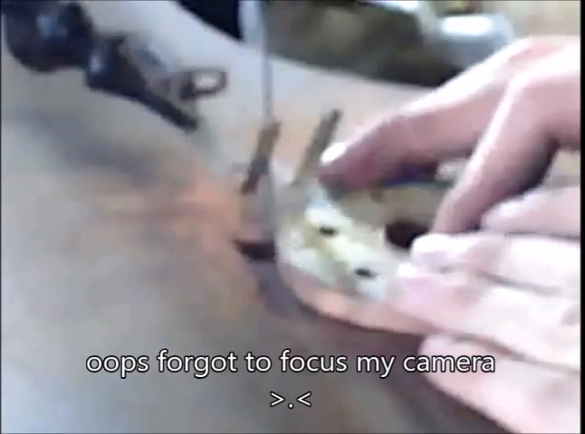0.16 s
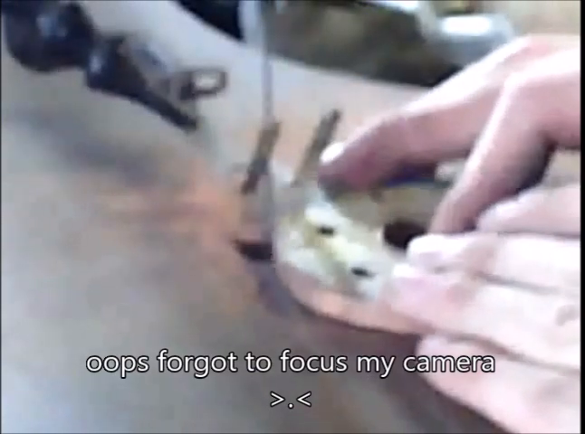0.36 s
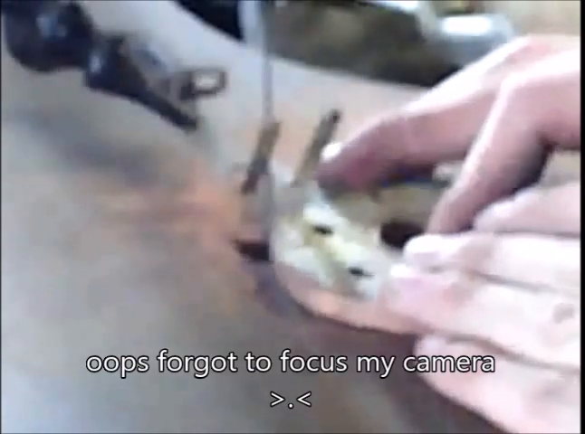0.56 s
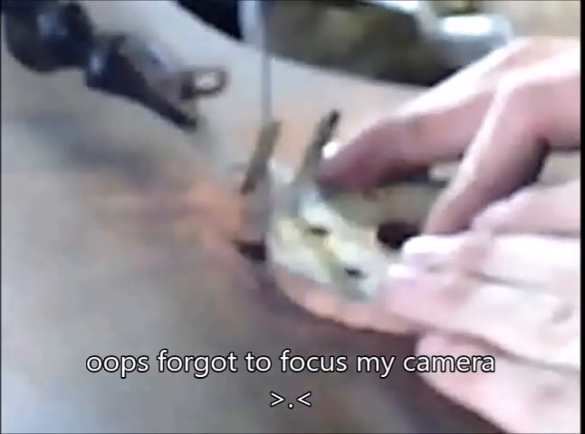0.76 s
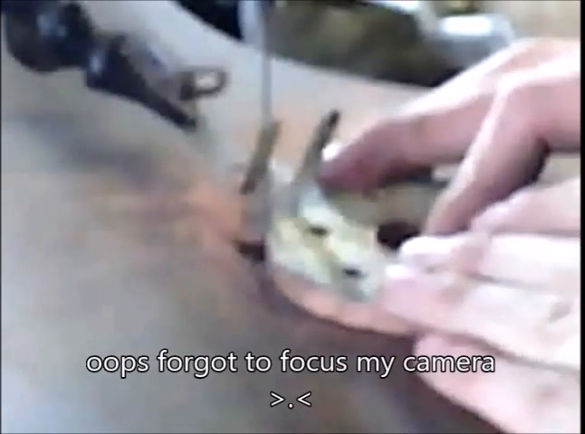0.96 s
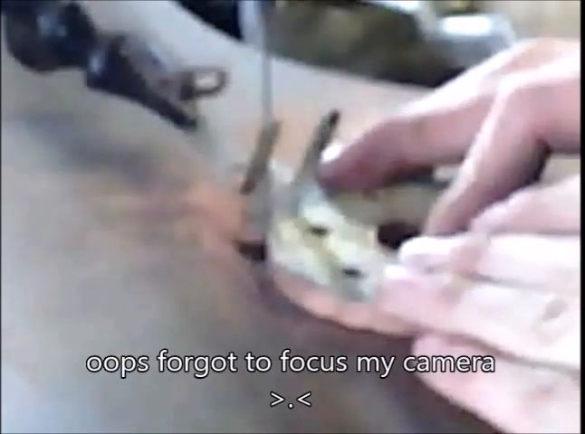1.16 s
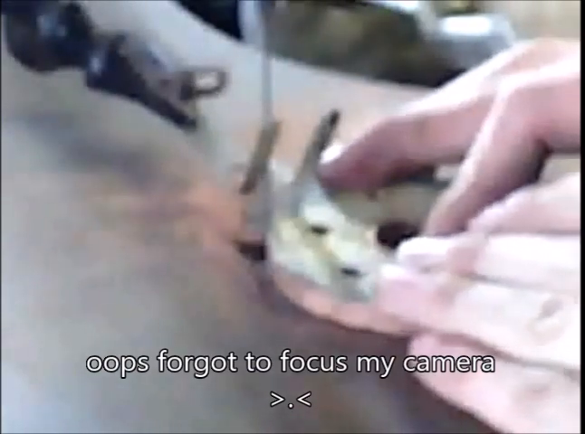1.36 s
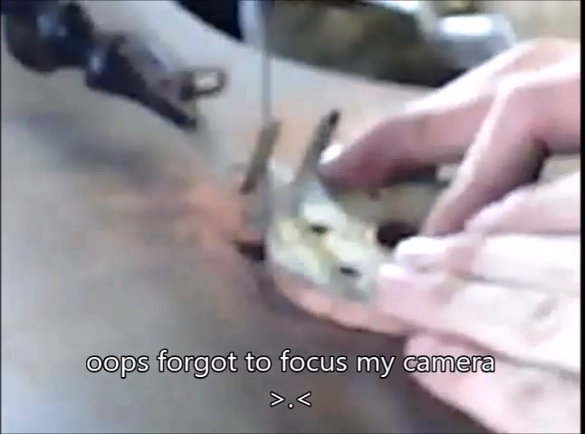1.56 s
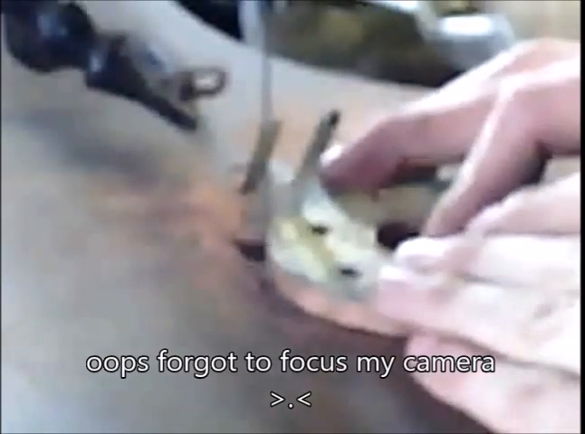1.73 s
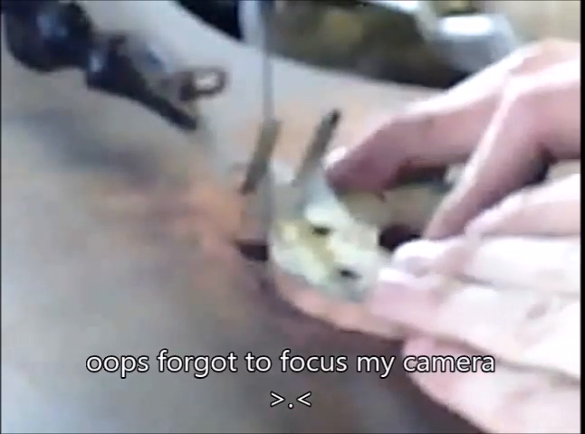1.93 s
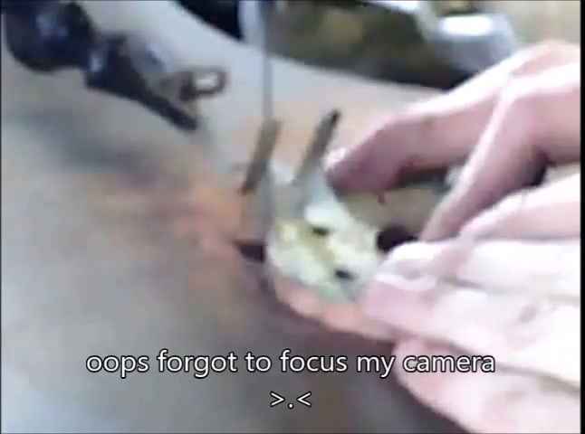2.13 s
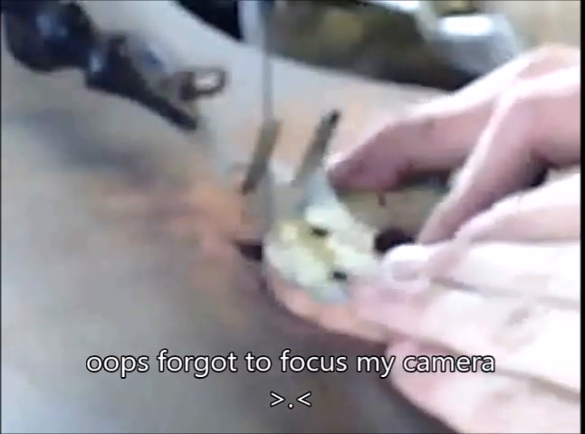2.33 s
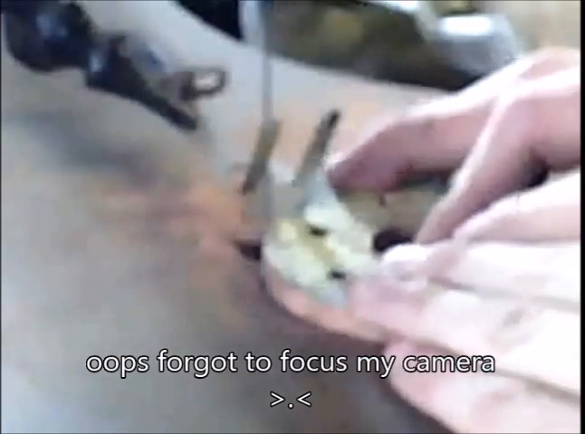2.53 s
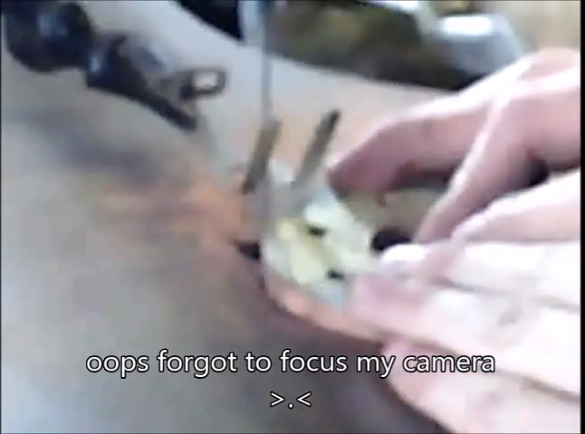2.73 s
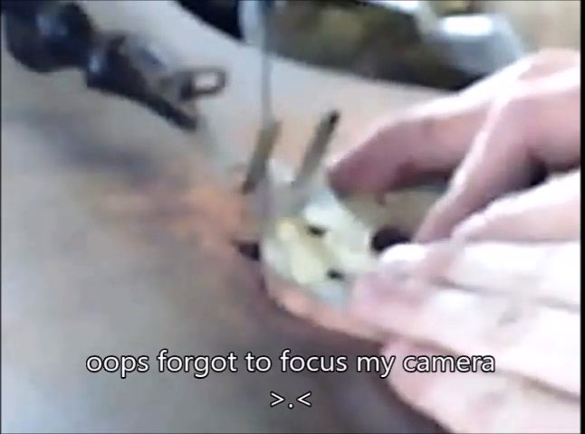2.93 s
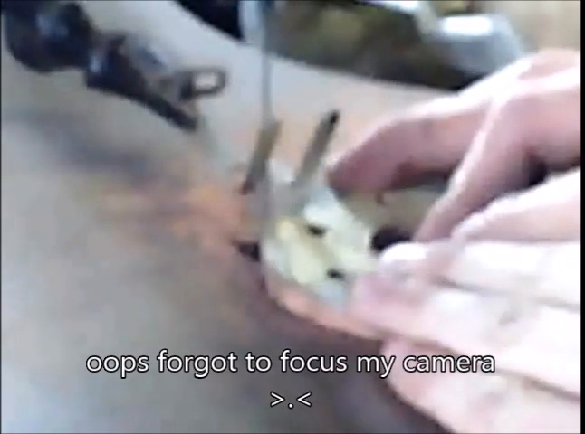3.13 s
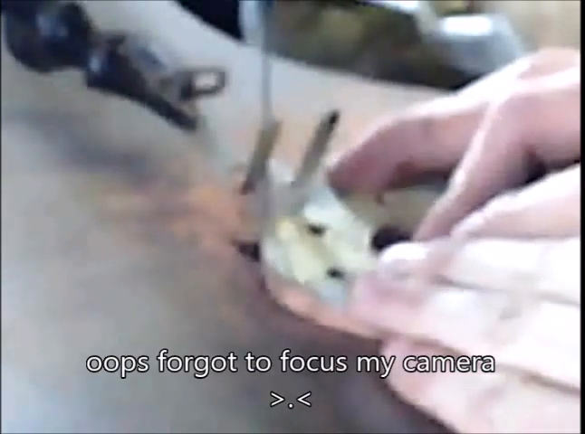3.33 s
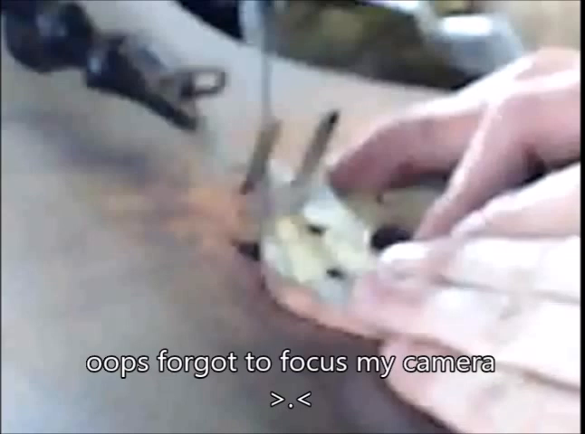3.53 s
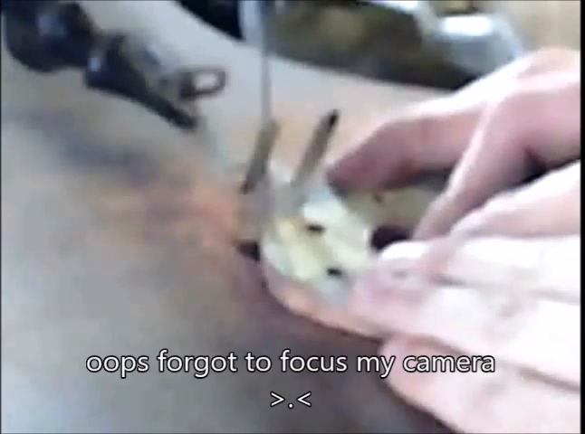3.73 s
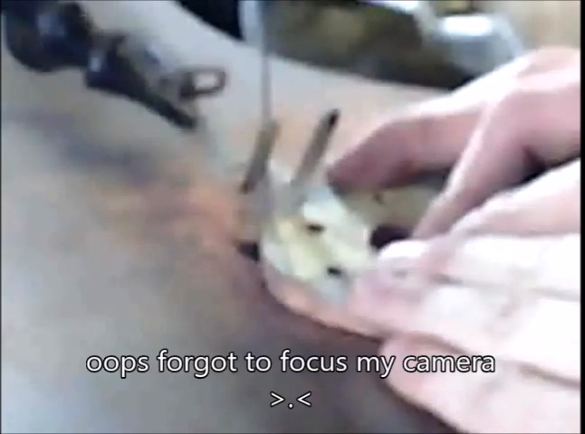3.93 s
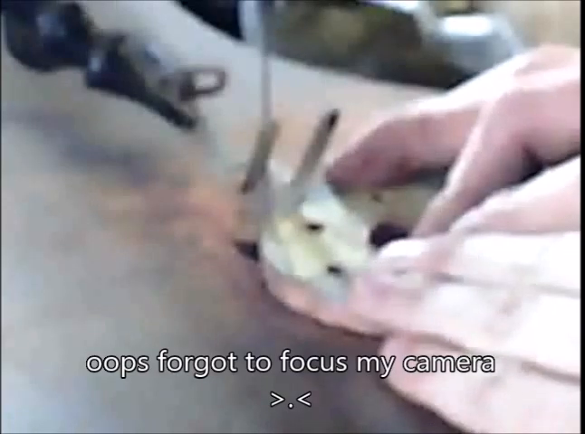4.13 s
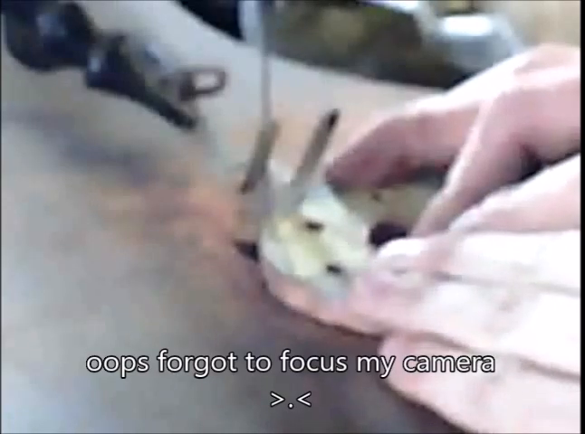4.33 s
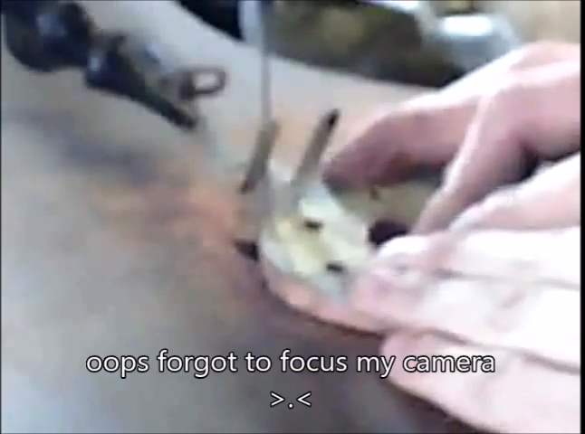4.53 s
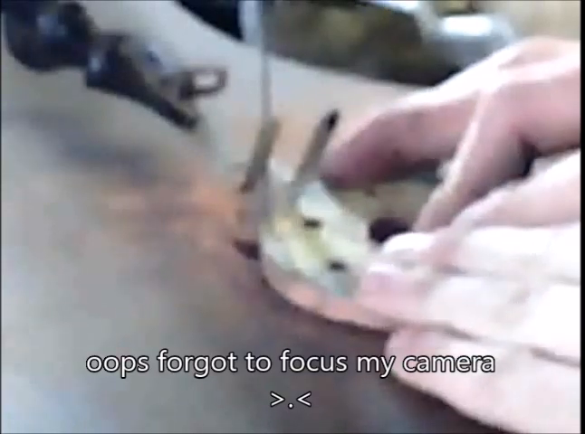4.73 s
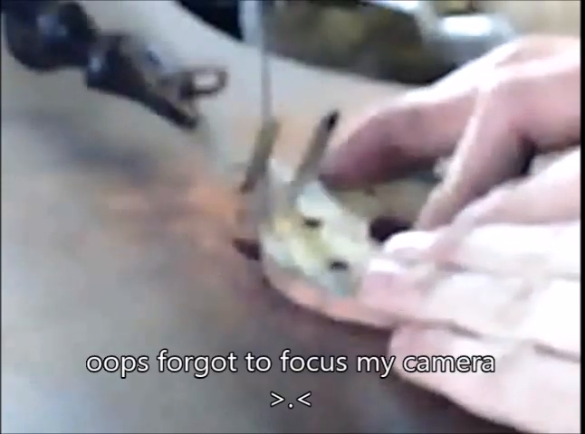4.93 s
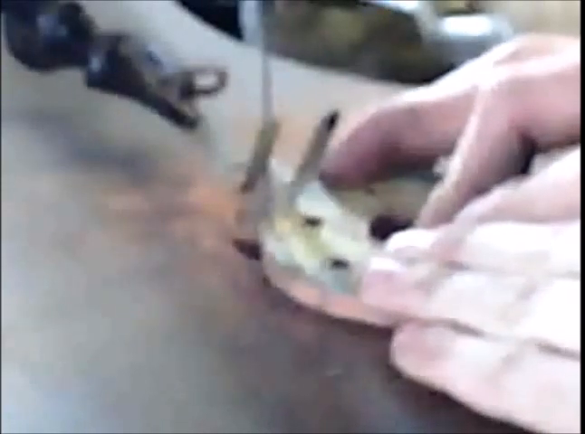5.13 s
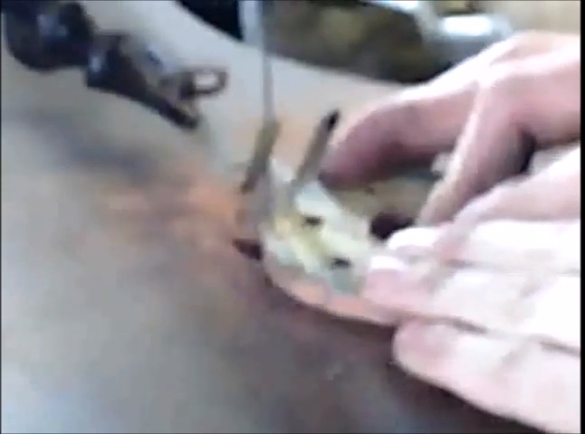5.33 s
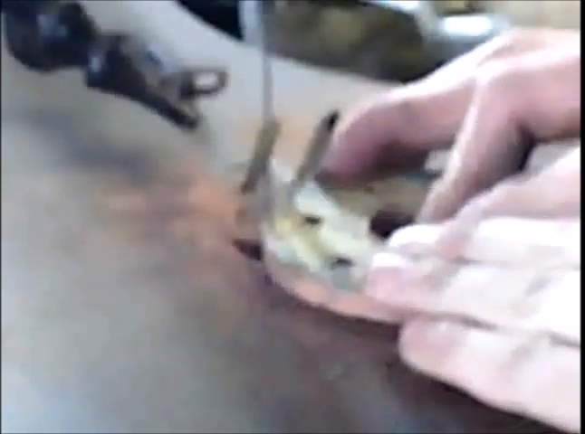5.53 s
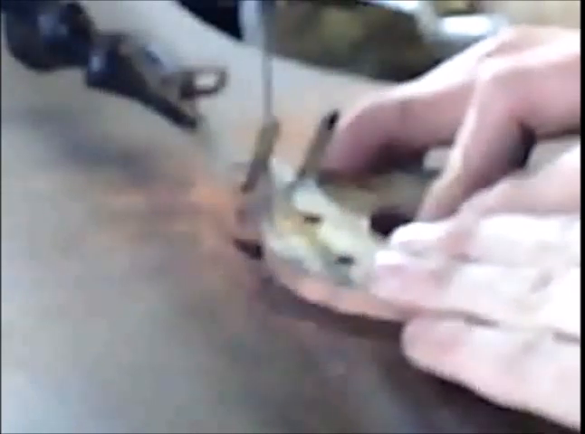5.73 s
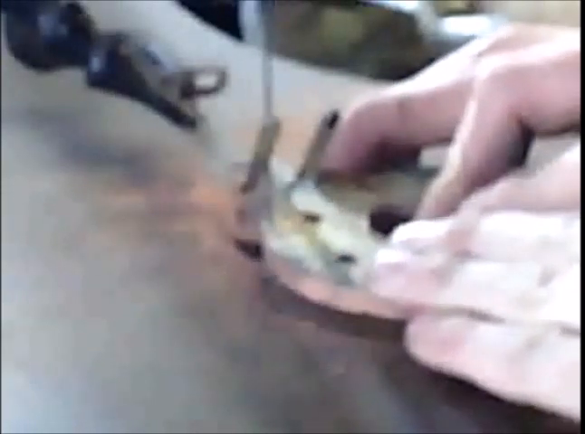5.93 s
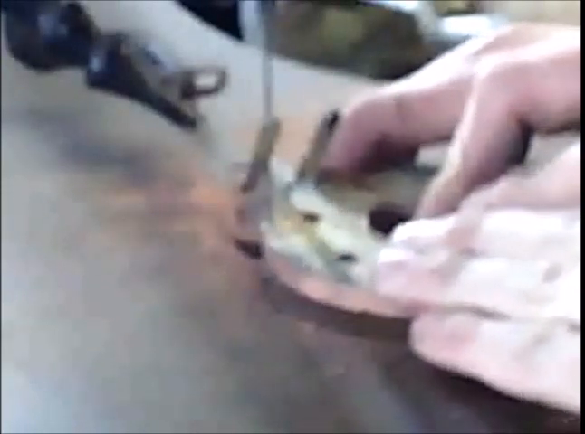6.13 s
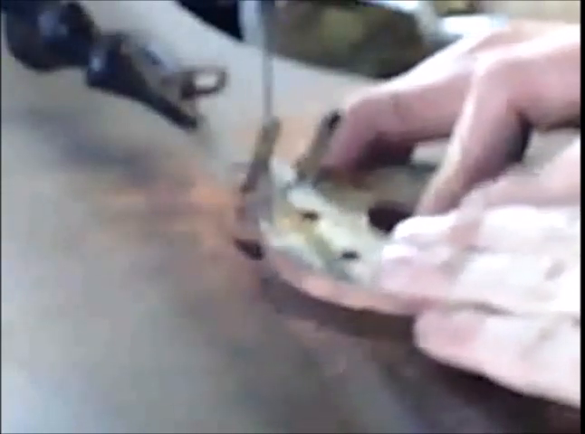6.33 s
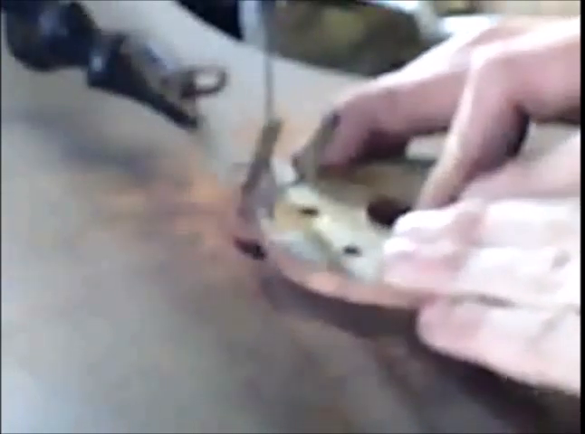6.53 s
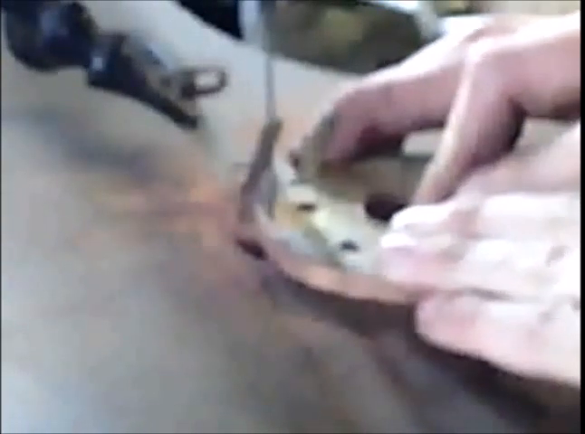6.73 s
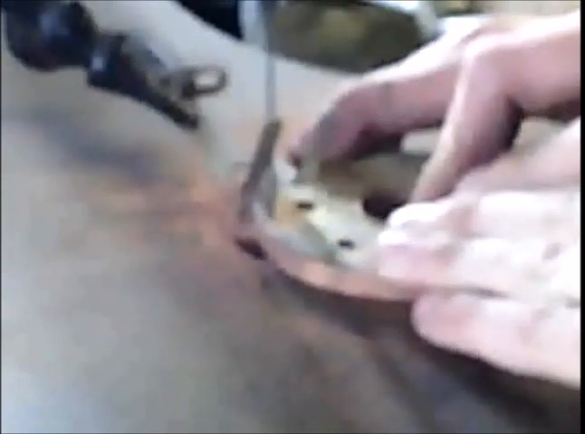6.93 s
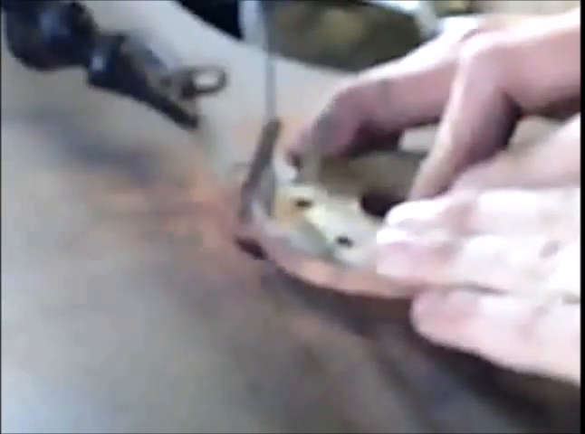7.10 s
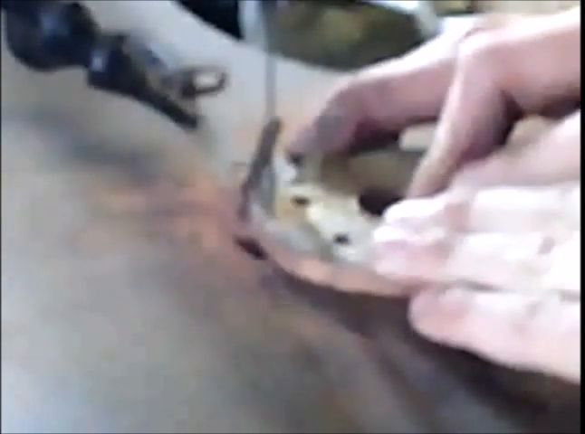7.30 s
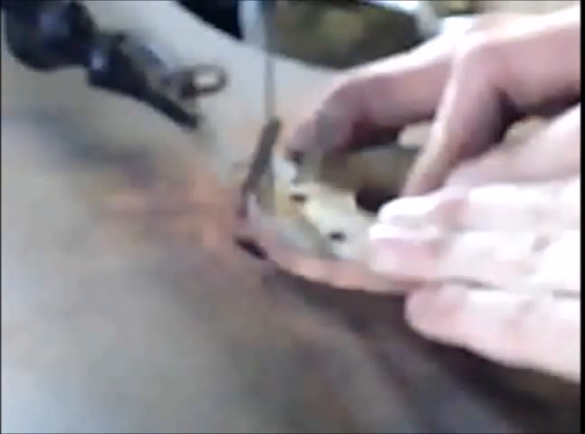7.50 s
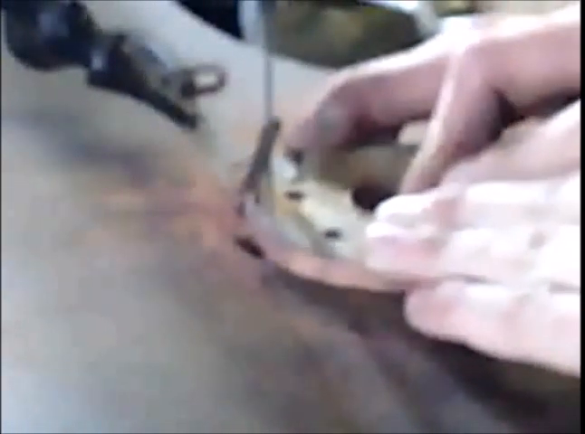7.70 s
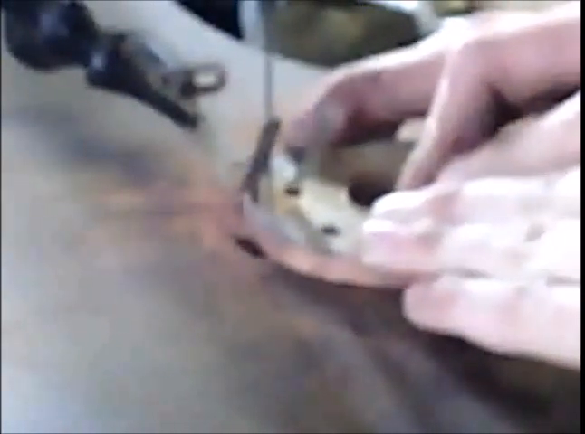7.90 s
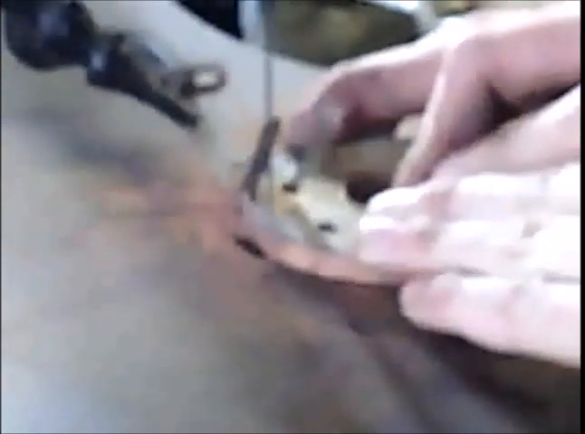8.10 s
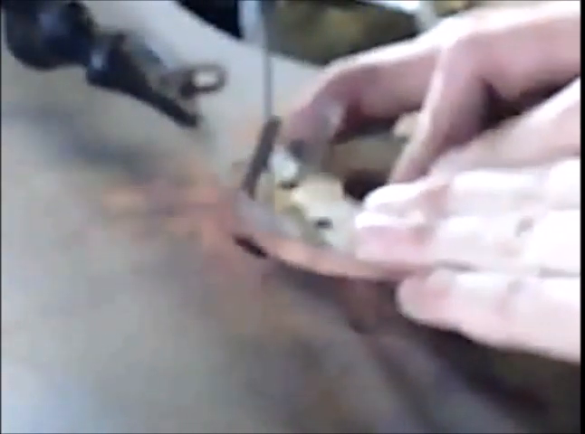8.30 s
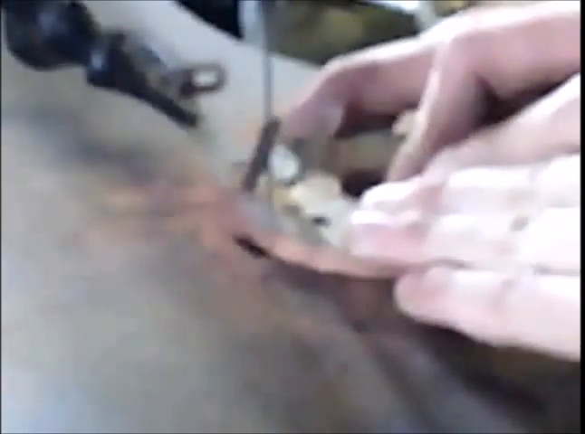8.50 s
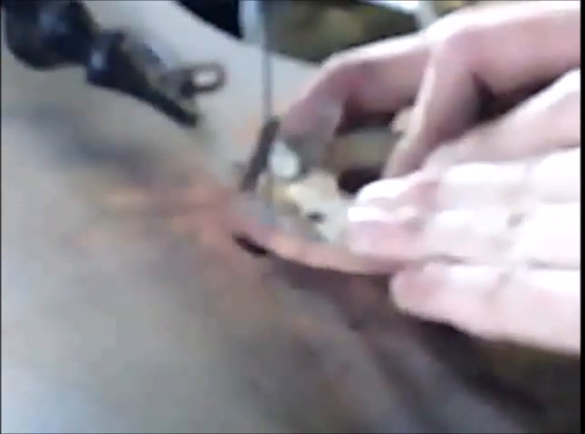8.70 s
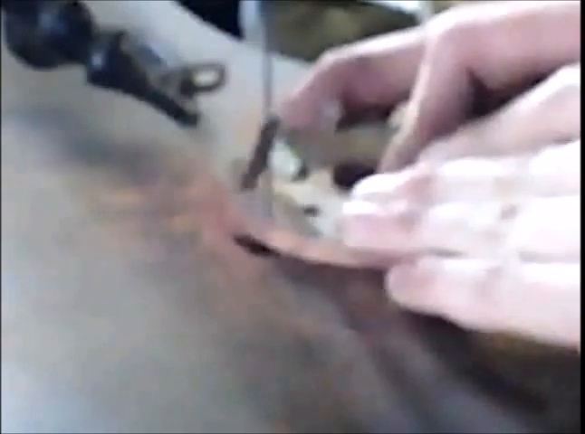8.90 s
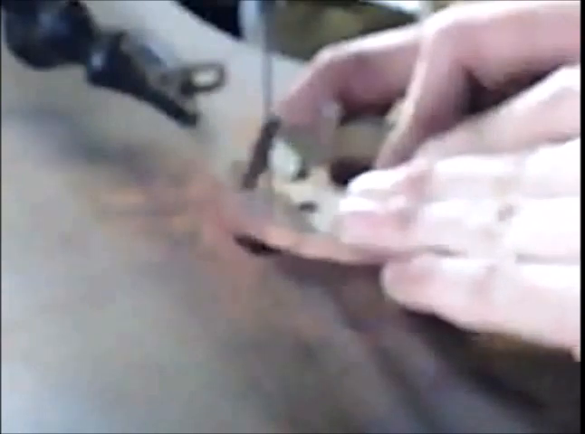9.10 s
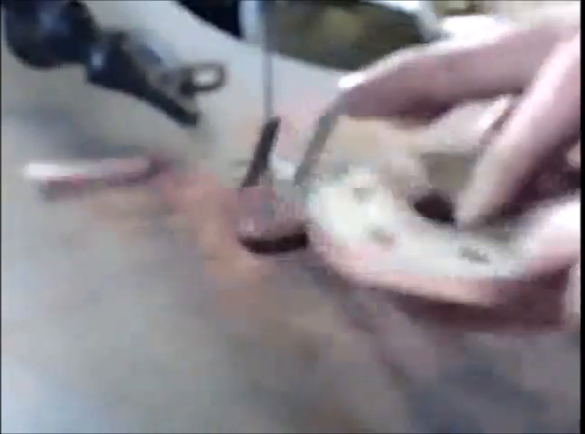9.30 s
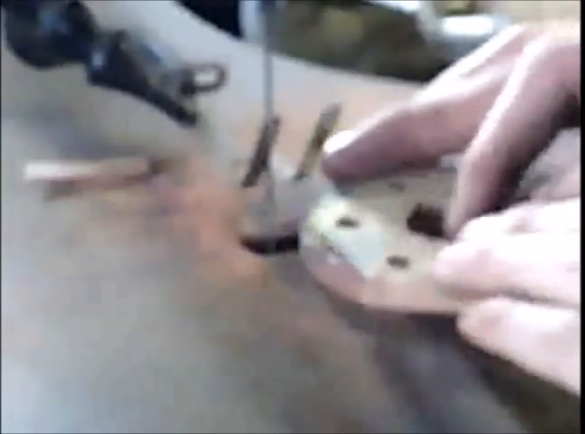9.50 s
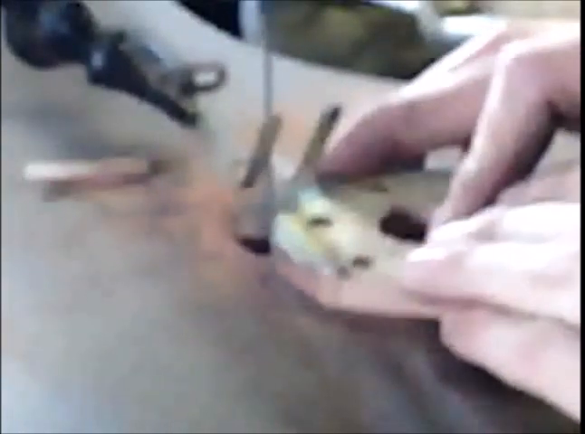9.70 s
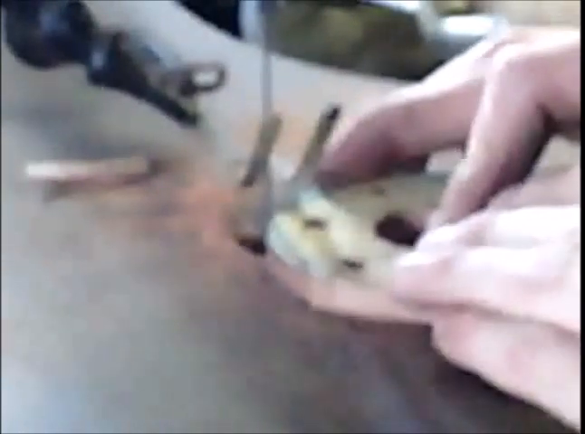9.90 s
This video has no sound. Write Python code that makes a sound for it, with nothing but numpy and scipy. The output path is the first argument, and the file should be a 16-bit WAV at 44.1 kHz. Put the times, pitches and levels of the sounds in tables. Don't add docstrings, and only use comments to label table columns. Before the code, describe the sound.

A scroll saw runs close to a cheap mono microphone, with faint low workshop rumble beneath. For the first 0.7 seconds it idles: a fast, ticking motor purr at about 27 strokes a second. Then the blade enters a small piece of wood with sharp cracks and gritty, pulsing rasp. The clamp rattles strongly around 1.7 seconds, and the cut eases for a moment near 2.1 before biting again. From 2.5 to 4.4 seconds snags crackle and tear, while the wood hums and the blade twangs; the cut then continues rough and dusty. At about 6.4 seconds the sound abruptly becomes four times faster and two octaves higher, a thin, shrill, fluttering buzz with twanging swells. Around 9.3 seconds the blade leaves the wood and the motor whines freely, wavering, until cutting resumes at about 9.75. Tiny digital dropouts smear the sound throughout, and the highest treble is missing.

```python
import sys
import numpy as np
from scipy import signal
from scipy.fft import rfft, irfft, next_fast_len
from scipy.io import wavfile
from scipy.ndimage import uniform_filter1d

SR = 44100
rng = np.random.default_rng(int(sys.argv[2]) if len(sys.argv) > 2 else 0)


def to_wav(s):
    ch = np.atleast_2d(s).T
    pcm = np.round(np.clip(ch, -1, 1) * 32767)
    wavfile.write(sys.argv[1], SR, pcm.astype(np.int16))


def amplitude_ratio(level_db):
    exponent = np.asarray(level_db, float) / 20
    return 10 ** exponent


N = 438794
TIME = np.arange(N) / SR

STROKE_HZ, CHANGE_S = 26.6, 6.381
NORMAL, FASTER = 1, 4
DEEP_S = 2.3

# time_s, pressure_db, looseness_of_piece_db
FEED = [(.8, -27, -3.5), (.92, -21, -5.5), (1.15, -25.5, -2.5), (1.44, -23.5, -12), (1.6, -24.5, -2.5),
        (1.95, -25, 3), (2.22, -27, -1), (2.42, -29.5, -2.5), (2.56, -23.5, -3), (3.2, -24, -3.5),
        (3.5, -24, -6), (3.82, -22, -5.5), (4.1, -23, -11), (4.6, -24, -16), (4.78, -24.5, -5.5),
        (5.1, -26, -14.5), (5.45, -26, -5.5), (6.33, -29.5, -6)]
# time_s, buried_share, dust_db
BURIED = [(.7, 0.23, -2.5), (1.6, 0.53, -1), (2, 0.25, -1.5), (2.2, 0.62, -3.5), (2.44, 0.37, -2.5),
          (2.56, 0.36, -4), (2.9, 0.53, -0.5), (3.7, 0.88, -3), (4.6, 0.68, -1.5), (5.2, 0.74, 1.5),
          (6.3, 0.55, 5)]
# centre_hz, width_hz, level_db
RASP_HIGH = [(7000, 230, 1.5), (7895, 240, 3.5), (8340, 350, 5), (8920, 710, 0), (9600, 500, -6)]
# centre_s, half_length_s, level_db
TWANGS = [(3.4, 1, -47.5), (5.7, 0.8, -44), (6.55, 0.086, -43), (6.85, 0.47, -50), (7.24, 0.1, -37),
          (7.52, 0.27, -37), (7.83, 0.15, -37.5), (8, 0.15, -35.5), (8.6, 0.2, -37), (8.83, 0.11, -33),
          (9.08, 0.21, -37), (9.24, 0.03, -40)]
# start_s, peak_db
SNAGS = [(0.772, -9), (0.8099, -7), (0.8572, -2), (0.8876, -6), (0.895, -2), (0.921, -12), (0.9328, -8),
         (0.962, -1), (0.971, 0), (1.001, -12), (1.0092, -3), (1.048, -3), (1.0745, -12), (1.1136, -13),
         (1.374, -12), (1.412, -4), (1.45, 1.5), (1.485, -13), (2.533, -2), (2.568, -5), (2.6085, -4),
         (2.6876, -6), (2.799, 3.5), (2.8374, -2), (3.3684, -1), (3.406, 1), (3.7868, 1)]
# start_s, peak_db
MORE_SNAGS = [(0.9634, -8), (0.994, -17), (1.1687, -15), (1.187, -7), (1.28, -13), (1.321, -14),
              (1.3583, -15), (1.527, -13), (1.942, -18), (2.2057, -12), (2.6444, -14), (2.7616, -6),
              (2.878, -1), (2.9183, -3), (2.9926, -3), (3.031, -2), (3.0698, -4), (3.1433, -9),
              (3.4446, -5), (3.5184, -13), (3.6726, -9), (3.71, -6), (3.7454, 1), (3.8182, -13),
              (3.9374, -7), (3.9734, -7), (4.1999, -3), (4.2752, -1), (4.3136, -11)]


def unit(x):
    return x / np.sqrt(np.mean(x ** 2) + 1e-20)


def curves(rows):
    s, *cols = np.transpose(rows)
    return [np.interp(TIME, s, c) for c in cols]


def wobble(rate):
    knots = rng.standard_normal(int(N * rate / SR) + 4)
    return np.interp(TIME * rate, np.arange(len(knots)), knots)


def bouts(rows):
    return sum(amplitude_ratio(db) * np.cos(np.pi / 2 * np.clip((TIME - s) / half, -1, 1)) for s, half, db in rows)


def filtered(x, response):
    m = next_fast_len(N + 8192)
    spectrum = rfft(x, m) * response(np.fft.rfftfreq(m, 1 / SR))
    return unit(irfft(spectrum, m)[:N])


def colour(points, speed=NORMAL):
    f, db = np.transpose(points)
    return lambda hz: amplitude_ratio(np.interp(np.log(hz + 1), np.log(f * speed), db))


def modes(table, speed=NORMAL):
    def peaks(f):
        total = 0
        for k, (centre, width, db) in enumerate(table):
            damping = 1j * f * width
            total = total + (-1) ** k * amplitude_ratio(db) * damping / (centre * centre - f * f + damping)
        return total

    corner = 0.45 * speed * min(table)[0]
    return lambda hz: peaks(hz / speed) * (1j * hz / (1j * hz + corner)) ** 3


def scrape(crank, start, rise, fall, rest_db, scatter_db, grit, same=0):
    turn = crank - start + 4
    part = turn % 1
    strength = amplitude_ratio(scatter_db * rng.standard_normal(2000))[turn.astype(int)]
    gate = amplitude_ratio(rest_db) + strength * (1 - np.exp(-part / rise)) * np.exp(-(part / fall) ** 2)
    habits = rng.standard_normal((200, round(N / np.ptp(turn))))
    place = (part * habits.shape[1]).astype(int)
    age = turn / 7
    row, angle = age.astype(int), np.pi / 2 * (age % 1)
    habit = np.cos(angle) * habits[row, place] + np.sin(angle) * habits[row + 1, place]
    fresh = np.exp(grit * rng.standard_normal(N)) * rng.standard_normal(N)
    share = np.clip(same, 0, 1)
    return gate * (np.sqrt(share) * habit + np.sqrt(1 - share) * fresh)


def struck(events, hz, t60, attack_s):
    out, t = np.zeros(N), np.arange(2600) / SR
    shape = amplitude_ratio(-60 * t / t60) * (1 - np.exp(-t / attack_s))
    for (s, db), (tune, phase) in zip(events, rng.standard_normal((len(events), 2))):
        tone = np.sin(2 * np.pi * hz * (1 + 0.0043 * tune) * t + 2 * phase)
        out[round(s * SR):][:len(t)] += amplitude_ratio(db) * shape / shape.max() * tone
    return out


def effort(feed, cuts, speed):
    enter_s, leave_s, clear_db = 0.1, 0.15, -21.5
    press_db, loose_db = curves(feed)
    inside = 0
    for a, b in cuts:
        inside = inside + np.clip(np.minimum((TIME - a) / enter_s, (b - TIME) / leave_s) * speed, 0, 1)
    return press_db + clear_db * (1 - inside), loose_db


def cutting(crank, press_db, loose_db):
    # centre_hz, width_hz, level_db
    rasp_low = [(4310, 40, -15), (5176, 360, 0.5), (5586, 104, 5.5), (5950, 790, -1)]
    # centre_hz, width_hz, level_db
    rasp_fine = [(4330, 22, -4), (4520, 44, -10.5), (5215, 30, -6), (5180, 50, -2.5), (5570, 40, -1),
                 (6190, 50, -9.5), (6800, 37, -3), (7070, 39, 3.5), (7830, 44, -3.5), (8150, 45, -5.5),
                 (8810, 40, -2), (9210, 40, -20), (9340, 40, -18), (9680, 46, -1)]
    # centre_hz, width_hz, level_db
    guide = [(4290, 45, 0)]
    # frequency_hz, density_db
    dust_colour = [(180, -74), (300, -6.5), (392, -16.5), (1080, -9), (1510, -4.5), (2030, -13), (3290, -7),
                   (4150, -9.5), (8220, -5.5), (10600, -16.5), (16000, -33)]
    # time_s, level_db
    upstroke = [(.7, 0), (2, 0.5), (2.3, -5), (3.1, -1), (3.9, -4), (4.5, -2), (6.3, 7)]
    # time_s, lead_strokes
    lead = [(.8, 0.068), (1.65, 0.32), (1.9, 0.24), (2.26, 0.33), (3.1, 0.12), (3.65, 0.1), (4.1, -0.065),
            (4.7, 0.11), (5.2, 0.065), (6.3, 0.12)]
    # start_s, peak_db
    plucks = [(0.8192, -25), (0.8583, -20), (0.8965, -31), (0.9725, -23), (1.0112, -24), (1.0487, -22),
              (1.0896, -27), (1.2377, -37), (1.3989, -28), (1.6213, -20.5), (1.6578, -23), (1.697, -22),
              (1.7346, -19.5), (1.773, -20), (1.8114, -20), (1.8498, -29), (1.8886, -24), (1.9272, -25),
              (2.6672, -21), (2.7422, -21), (2.776, -21), (2.8131, -19.5), (2.8565, -22), (2.889, -20),
              (2.9653, -22), (3.0041, -24), (3.0421, -32), (3.1189, -32), (3.2332, -24), (3.2707, -33),
              (3.4616, -29), (3.503, -32), (3.537, -24), (3.6033, -25), (3.6882, -29), (3.7275, -29),
              (3.802, -25), (4.0658, -24), (4.2155, -21), (4.2527, -25), (4.2908, -23), (4.3691, -23),
              (4.407, -23), (4.4459, -22), (4.4826, -20), (4.52, -22), (4.5565, -19), (4.5943, -17),
              (4.633, -17.5), (4.6699, -21), (4.707, -18), (4.7443, -17), (4.7824, -21.5), (4.895, -26),
              (5.1194, -30), (5.1578, -28), (5.2331, -25), (5.304, -42), (5.4945, -28), (5.647, -28)]
    # start_s, peak_db
    clacks = [(0.7387, -29), (0.7628, -28), (0.8197, -35), (0.8651, -33), (0.886, -32), (0.9363, -30),
              (0.9778, -37), (1.0242, -35), (1.0801, -34), (1.2053, -33), (1.2292, -36), (1.4173, -37),
              (1.5321, -42), (1.6423, -35), (1.709, -30), (1.7331, -28), (1.7702, -32), (1.8059, -32),
              (1.9042, -35), (1.9242, -34), (2.008, -28), (2.1337, -33), (2.1675, -29), (2.234, -32),
              (2.2709, -23.5), (2.3153, -30), (2.3382, -34), (2.3761, -22), (2.415, -29), (2.45, -25)]

    low_share, usual_feed_db = 1, -26
    low_db = press_db + (low_share - 1) * (curves(FEED)[0] - usual_feed_db) - 30.5 - usual_feed_db
    low = filtered(scrape(2 * crank, -.2, .1, 0.81, -16.0, 3.2, 0.24, same=0.27), modes(rasp_low))
    down = scrape(crank, .43, 0.061, 0.34, -37.0, 1.34, 0.51, same=0.41)
    up = scrape(crank, .92, 0.05, 0.29, -23, 0.94, 0.62, same=0.36)
    teeth = down + amplitude_ratio(curves(upstroke)[0]) * up

    buried, packed_db = curves(BURIED)
    buried = np.clip(buried, 0, 1)
    high = np.sqrt(1 - buried) * filtered(teeth, modes(RASP_HIGH[:1]))
    high -= np.sqrt(buried) * filtered(teeth, modes(RASP_HIGH[1:]))
    dust = filtered(scrape(2 * crank, -0.25, 0.081, 1.0, 3.0, 4.7, 0.42, same=0.24), colour(dust_colour))

    hum = amplitude_ratio(press_db + loose_db - 3.5) + bouts([(5.92, 0.16, -39), (6.26, 0.092, -41)])
    twang = amplitude_ratio(press_db - 18.5) + bouts(TWANGS)
    wood = hum * board(crank + curves(lead)[0], NORMAL) + twang * blade(crank, NORMAL)
    wood += amplitude_ratio(-3.0) * struck(plucks, hz=3317, t60=.05, attack_s=0.0015)
    wood += amplitude_ratio(-3.5) * struck(clacks, hz=2590, t60=0.053, attack_s=.002)
    wood += bouts([(6.0, 0.5, -44.5)]) * filtered(teeth, modes(guide))
    wood += amplitude_ratio(press_db - 9.0) * filtered(teeth, modes(rasp_fine))
    wood += amplitude_ratio(low_db - 2.0) * low
    wood += amplitude_ratio(press_db - packed_db - 1.0) * high
    return wood + amplitude_ratio((low_db + press_db) / 2 + packed_db - 3.0) * dust


def cutting_fast(crank, press_db, loose_db):
    # centre_hz, width_hz, level_db
    rasp_top = [(3100, 17, -3), (3780, 59, -2.5), (3890, 33, -1.5)]
    # frequency_hz, density_db
    dust_colour = [(300, -70), (850, -53), (1450, -12.5), (1860, -22), (2290, -11.5), (4330, -13.5),
                   (6050, -1), (7300, -11.5), (8100, -10.5), (9150, -12), (11600, -9.5), (13200, -9.5),
                   (15700, -17)]
    top = filtered(scrape(crank, -.06, .03, .3, -8, 3, .2, same=.3), modes(rasp_top, FASTER))
    dust = filtered(scrape(crank, -.1, 0.077, 1.0, -0.3, 4.6, 0.17, same=0.34), colour(dust_colour))
    twang = amplitude_ratio(press_db + 2) + bouts(TWANGS)
    wood = amplitude_ratio(press_db + loose_db + 2.0) * board(crank, FASTER) + twang * blade(crank, 3.96)
    top_level = amplitude_ratio(press_db - 7.5) + 0.32 * twang
    return wood + top_level * top + amplitude_ratio(press_db + 5.5) * dust


def board(crank, speed):
    # centre_hz, width_hz, level_db
    plate = [(1293, 56, -6), (1485, 24, -3), (1557, 26, 0), (1665, 45, -11)]
    # time_s, level_db
    sag = [(.8, -8.5), (1.1, -6), (1.8, -10), (2.4, -14), (3.1, -1), (3.8, -9.5), (4.8, -6.5), (5.5, -8),
           (6.2, -10)]
    drive = scrape(crank, .66, 0.12, 0.47, -14.5, 0.65, 0.19, same=0.54)
    upper = filtered(drive, modes(plate[1:], speed))
    lowest = filtered(drive, modes(plate[:1], speed))
    return unit(upper - amplitude_ratio(curves(sag)[0] + 2.5) * lowest)


def blade(crank, speed):
    # centre_hz, width_hz, level_db
    strip = [(3325, 50, 0), (3655, 28, -11)]
    return filtered(scrape(crank, -0.09, 0.026, 0.15, -16.5, 0.66, 0.05, same=0.5), modes(strip, speed))


def snags():
    free_hz, rise_hz = 6070, 2290
    out, t = np.zeros(N), np.arange(900) / SR
    band = signal.butter(2, [2800, 9500], "band", fs=SR, output="sos")
    for s, db in SNAGS + MORE_SNAGS:
        hz = free_hz + rise_hz * np.interp(s, *np.transpose(BURIED)[:2])
        crack = .3 + .6 * np.exp(-((s - .95) / .2) ** 2)
        ring = np.sin(2 * np.pi * hz * t) * amplitude_ratio(-60 * t / 0.011)
        ring += crack * rng.standard_normal(len(t)) * amplitude_ratio(-60 * t / 0.012)
        ring = signal.sosfilt(band, ring * (1 - np.exp(-t / 0.00012)))
        out[round(s * SR):][:len(t)] += amplitude_ratio(db - 2.5 - 8 * (s > DEEP_S)) * ring / abs(ring).max()
    return out


def tears():
    # start_s, peak_db
    late_snags = [(4.3523, -12), (4.3903, -15), (4.4242, -18), (4.4671, -3), (4.5039, -11), (4.5432, -17),
                  (4.5549, -13), (4.5763, -7), (4.6172, -12), (4.6515, -18), (4.6906, -18), (4.727, -18),
                  (4.8034, -10), (4.8806, -7), (4.93, -22), (4.953, -19), (5.0053, -9), (5.0416, -14),
                  (5.2697, -17), (5.2937, -12), (5.3645, -21), (5.528, -15), (5.5945, -10), (5.642, -12),
                  (5.7018, -9), (5.7945, -18), (5.828, -7), (5.9048, -12), (5.9407, -16), (6.0041, -8),
                  (6.018, -10), (6.056, -19), (6.0954, -19), (6.1343, -11), (6.1916, -9), (6.2276, -12),
                  (6.3169, -19), (6.3573, -23)]
    # start_s, peak_db
    nicks = [(1.0769, -17), (1.1143, -16), (1.1687, -17), (1.1841, -15), (1.243, -19), (1.2594, -15),
             (1.2819, -12), (1.3203, -14), (1.3587, -15), (1.3931, -13), (1.4101, -14), (1.4316, -11),
             (1.4685, -9), (1.4859, -16), (1.8287, -15), (1.9419, -15)]
    gate, t = np.zeros(N), np.arange(1500) / SR
    for s, db in SNAGS + MORE_SNAGS + [(s, db + 2.0) for s, db in late_snags]:
        gate[round(s * SR):][:len(t)] += (s > DEEP_S) * amplitude_ratio(db - 60 * t / 0.024) * (1 - np.exp(-t / 0.00084))
    for s, db in nicks:
        gate[round(s * SR):][:len(t)] += amplitude_ratio(db + 11.0 - 60 * t / 0.023) * (1 - np.exp(-t / .0008))
    burst = gate * rng.standard_normal(N)
    return amplitude_ratio(-13.5) * np.std(burst) * filtered(burst, modes(RASP_HIGH[:4]))


def arm(crank, shake_db, speed):
    # centre_hz, width_hz, level_db
    beam_modes = [(2342, 28, 0), (903, 34, -3)]
    # centre_hz, width_hz, level_db
    clamp_modes = [(2570, 110, 0)]
    # centre_s, half_length_s, level_db
    rattles = [
        (.9, 0.35, -42),
        (1.7, 0.3, -32),
        (2.2, 0.33, -41),
        (3.5, 1.1, -37.5),
        (6.05, 0.36, -48),
        (6.5, 0.32, -38),
        (7.7, 0.57, -45),
        (8.3, 0.12, -46),
        (9, 0.24, -56),
        (9.8, 0.094, -36),
    ]
    beam = filtered(scrape(crank, -.17, 0.058, 0.33, -9.0, 3.6, 0.4, same=0.45), modes(beam_modes, speed))
    blows = scrape(crank, 0.32, 0.014, 0.088, 4, 4.3, 0.24, same=0.23)
    blows += 0.91 * scrape(crank, .7, 0.023, 0.29, -32, 2.9, 0.2)
    clamp = filtered(blows, modes(clamp_modes, speed))
    return amplitude_ratio(shake_db) * beam + amplitude_ratio(-8.0) * bouts(rattles) * clamp


def machine(crank, hum, speed, noise_db, ring_db, tick_db, steady):
    # multiple_of_stroke_rate, level_db
    orders = [(3, -25.5), (4, -16), (5, -42), (6, -3), (9, -6.5), (10, -2), (11, 3), (12, -9), (13, -7),
              (14, -23), (16, -13.5), (18, -24), (19, -5.5), (20, -3.5), (21, -4), (22, -0.5), (23, -4),
              (24, -25), (25, -25)]
    # frequency_hz, density_db
    motor = [(25, -37.5), (150, -12), (203, -19), (240, -3.5), (330, -3.5), (390, -16.5), (455, -14),
             (540, -3), (900, -6.5), (1810, -16), (2400, -7.5), (3980, -26), (6050, -5), (7670, -32.5),
             (12600, -18), (16000, -36)]
    # centre_hz, width_hz, level_db
    frame = [(570, 87, -4), (1280, 35, -17), (2170, 40, -14), (3030, 70, -10), (4550, 40, -15),
             (5050, 190, -11), (5615, 45, -3), (6013, 50, -4), (6200, 110, 1), (6310, 40, -4),
             (6490, 70, -6), (6695, 40, -7), (9290, 68, -10.5)]
    # centre_hz, width_hz, level_db
    link = [(3030, 56, 2.5), (6180, 1700, -5), (9530, 100, 3), (12500, 2000, -14.5)]
    # time_s, level_db
    grip = [(0, -16), (.8, -17), (1.3, -5), (2.2, -3), (3, -3.5), (4, 2), (5.2, 2), (6.37, -1.5),
            (6.4, -0.5)]

    low_db, = curves(hum)
    high_db = -45 + 0.37 * (low_db + 57)

    def order_sum(rows):
        total = 0
        for k, db in rows:
            phase = k * crank + .0028 * k * wobble(9 * speed) + rng.random()
            total = total + amplitude_ratio(db + 2.5 * wobble(7 * speed)) * np.sin(2 * np.pi * phase)
        return total

    low = order_sum(orders[:4])
    high = amplitude_ratio(curves(grip)[0]) * order_sum(orders[5:8]) + order_sum(orders[4:5] + orders[8:])
    rush = filtered(scrape(crank, .33, 0.0095, 1.0, -1.3, 1.0, 0.2, same=steady), colour(motor, speed))
    ring = filtered(scrape(crank, .34, 0.072, 0.6, -2.5, 0.35, 0.13, same=0.73), modes(frame, speed))
    knocks = scrape(crank, .32, 0.02, 0.14, -44, 0.92, 0.1, same=0.33)
    knocks += 0.073 * scrape(crank, 0.076, .004, 0.034, -31, 1.1, 0.098, same=0.56)
    tick = filtered(knocks, modes(link, speed))
    tones = amplitude_ratio(low_db + 2.0) * unit(low) + amplitude_ratio(high_db - 1.0) * unit(high)
    return tones + amplitude_ratio(noise_db) * rush + amplitude_ratio(ring_db) * ring + amplitude_ratio(tick_db) * tick


def housing(crank):
    # centre_hz, width_hz, level_db
    cover = [(9900, 73, -9), (11360, 120, 3), (11700, 32, -4), (12000, 38, -1), (12200, 90, 3),
             (12900, 52, -1), (13700, 67, -3), (14500, 100, -8)]
    return amplitude_ratio(-57.5) * filtered(scrape(crank, 0.3, .004, 0.25, -20, 1.5, .15, same=0.78), modes(cover))


def pin(crank):
    # centre_hz, width_hz, level_db
    link_pin = [(3020, 45, 0)]
    ring = filtered(scrape(crank, 0.33, .03, .4, -8, 2, .1, same=0.37), modes(link_pin, FASTER))
    return bouts([(9.5, 0.24, -51)]) * ring


def free_whine(crank):
    # time_s, level_db
    whine = [(9.25, -89), (9.28, -54), (9.38, -47), (9.45, -64), (9.75, -55), (9.8, -77)]
    # multiple_of_stroke_rate, level_db
    free_orders = [(6, -2), (11, -15), (14, -5), (19, -18), (20, -6), (21, -8), (22, 0), (31, 5), (35, 0),
                   (41, -19)]
    song = 0
    for k, db in free_orders:
        song = song + amplitude_ratio(db + 3 * wobble(30)) * np.sin(2 * np.pi * (k * crank + rng.random()))
    song = amplitude_ratio(curves(whine)[0]) * (TIME < whine[-1][0]) * song
    return song + bouts([(9.65, .3, -53)]) * amplitude_ratio(2.5 * wobble(25)) * np.sin(2 * np.pi * 22 * crank)


def workshop_floor():
    # frequency_hz, density_db
    rumble = [(15, 6), (40, -26), (80, -11), (120, -40), (300, -58)]
    level_db = -68.5 - 1.8 * (TIME > CHANGE_S) + 4.0 * wobble(4.6)
    return amplitude_ratio(level_db) * filtered(rng.standard_normal(N), colour(rumble))


def scene():
    # time_s, lag_strokes
    lag = [(0, 0.021), (.5, -0.068), (.9, -0.11), (1.2, 0.019), (1.55, 0.037), (1.85, 0.14), (2.1, 0.093),
           (2.65, -0.15), (3, 0.0083), (3.2, 0.061), (3.7, 0.069), (4.5, 0.22), (5.3, 0.18), (5.8, 0.081),
           (6.2, 0.13)]
    # time_s, lag_strokes
    lag_fast = [(6.4, -0.026), (6.55, -0.036), (6.8, 0.13), (7.15, 0.16), (7.5, -0.2), (8, -0.36),
                (8.5, -0.39), (8.8, -0.67), (9.0, -0.32), (9.25, -0.45), (9.29, -0.61), (9.35, -1.03),
                (9.4, -1.17), (9.45, -1.25), (9.7, -1.29), (9.95, -1.35)]
    # time_s, level_db
    hum = [(0.0, -64), (0.03, -61), (1.06, -67), (1.12, -62.5), (1.79, -63), (2.59, -57), (2.82, -68.5),
           (3.85, -57.5), (6.37, -58.5)]
    # time_s, level_db
    hum_fast = [(6.4, -58), (9.2, -59), (9.27, -67), (9.33, -67), (9.41, -56), (9.5, -62.5), (9.94, -65)]
    # time_s, pressure_db, looseness_of_piece_db
    feed_fast = [(6.4, -43.5, 5.5), (6.9, -41, -6.5), (7.1, -46, 4), (7.27, -44, -1.5), (7.6, -46.5, 7),
                 (8.4, -41, 0), (8.65, -45, 4.5), (9, -39, -2), (9.25, -42.5, 2), (9.79, -58, 17),
                 (9.89, -42, 7)]

    crank = STROKE_HZ * TIME - uniform_filter1d(curves(lag)[0], size=4000)
    press_db, loose_db = effort(FEED, [(0.679, 2.11), (2.12, 7)], NORMAL)
    normal = cutting(crank, press_db, loose_db) + snags() + tears()
    normal += arm(crank, press_db + 0.58 * loose_db - 15, NORMAL)
    normal += machine(crank, hum, NORMAL, noise_db=-40.0, ring_db=-35.0, tick_db=-44.5, steady=0.62)
    normal += housing(crank)

    quick = FASTER * STROKE_HZ * TIME - uniform_filter1d(curves(lag_fast)[0], size=2000)
    quick += 0.0038 * wobble(40) + .015 * uniform_filter1d(wobble(14), size=1500)
    press_db, loose_db = effort(feed_fast, [(6, 9.28), (9.74, 11)], FASTER)
    fast = cutting_fast(quick, press_db, loose_db) + arm(quick, press_db + 2.5, FASTER)
    fast += machine(quick, hum_fast, FASTER, noise_db=-40.5, ring_db=-52.5, tick_db=-51.0, steady=0.48)
    fast += pin(quick) + free_whine(quick)
    return (np.where(TIME < CHANGE_S, normal, fast) + workshop_floor())[None]


def held(x, t, count):
    size = abs(rfft(x * np.hanning(len(x))))
    tops = signal.find_peaks(size, distance=14)[0]
    prominence = size[tops] / uniform_filter1d(size, size=61)[tops] ** .9 / (1 + tops / 250)
    tops = tops[np.argsort(-prominence)[:count]]
    return np.sin(2 * np.pi * (np.outer(t, tops) * SR / len(x) + rng.random(count))) @ size[tops]


def bridged(x):
    # centre_s, length_s
    gaps = [(.95, .016), (2.058, .016), (3.103, .013), (3.637, .011), (4.852, .014), (4.917, .014),
            (5.513, .009), (5.621, .013), (6.282, .012), (6.508, .028), (6.559, .01), (6.623, .008),
            (6.943, .01), (7.028, .01), (7.434, .01), (7.562, .009), (7.647, .011), (7.691, .01),
            (7.754, .01), (7.839, .011), (7.903, .01), (8.33, .011), (8.714, .009), (8.864, .011),
            (9.269, .008), (9.738, .014), (9.823, .009)]
    out, t = x.copy(), (np.arange(2048) - 1024) / SR

    def ramp(reach):
        return np.sin(np.pi / 2 * np.clip((reach - abs(t)) / 0.0039, 0, 1))

    side = np.clip(.5 + t / 0.042, 0, 1)
    for s, length in gaps:
        part = slice(round(s * SR) - 1024, round(s * SR) + 1024)
        around = x[part]
        tones = np.sqrt(1 - side) * held(around[:1024], t, count=6)
        tones += np.sqrt(side) * held(around[1024:], t, count=6)
        carried = amplitude_ratio(-5) * unit(tones) * np.std(around) * ramp(min(length / 2 + 0.012, .023))
        lost = min(0.66 + 9 * length, .99)
        out[part] = around * (1 - lost * ramp(length / 2 + 0.0055) ** 2) + carried
    return out


def roll_off(x):
    return signal.sosfilt(signal.butter(12, 16390, fs=SR, output="sos"), x)


def record(dry):
    spectrum, hz = rfft(bridged(dry[0])), np.fft.rfftfreq(N, 1 / SR)
    before = irfft(spectrum * (hz < 15500), N)
    after = irfft(spectrum * (hz < 15830), N)
    mix = np.where(TIME < CHANGE_S, before, after)[None]
    return roll_off(mix)


dry = scene()
out = record(dry)
to_wav(out)
```